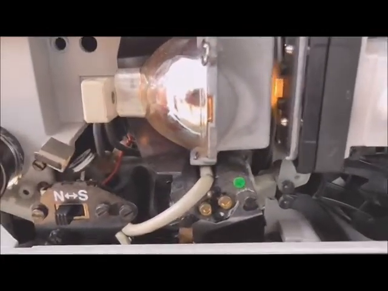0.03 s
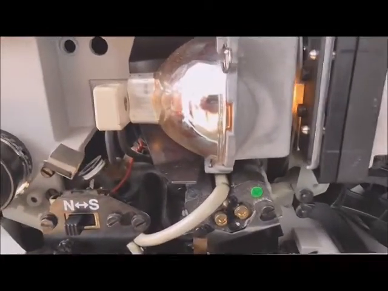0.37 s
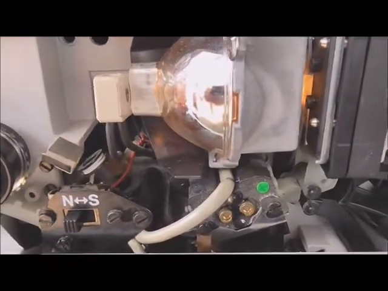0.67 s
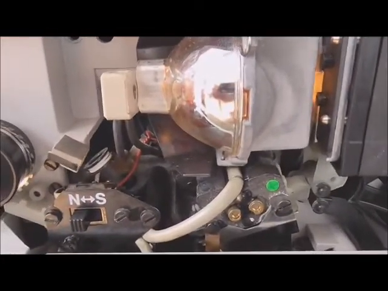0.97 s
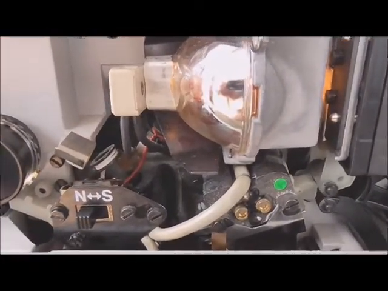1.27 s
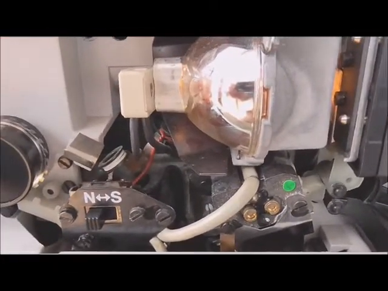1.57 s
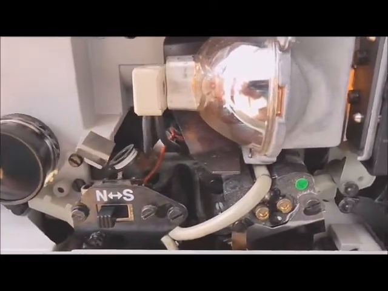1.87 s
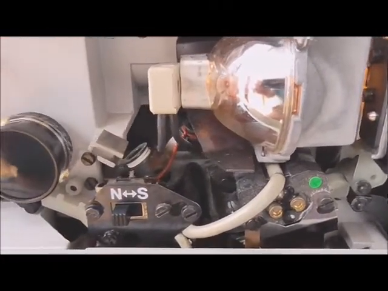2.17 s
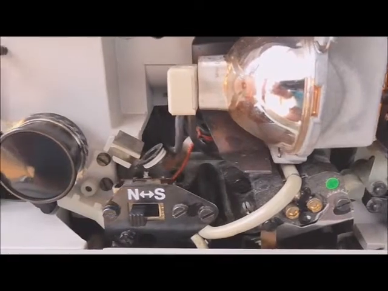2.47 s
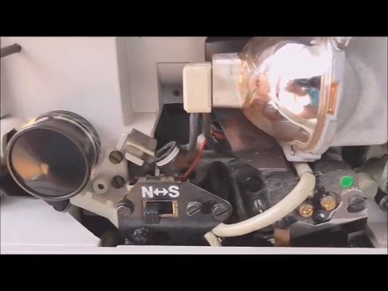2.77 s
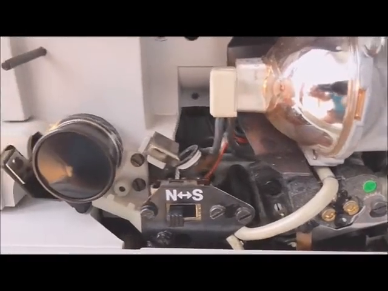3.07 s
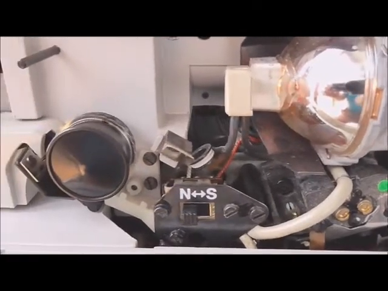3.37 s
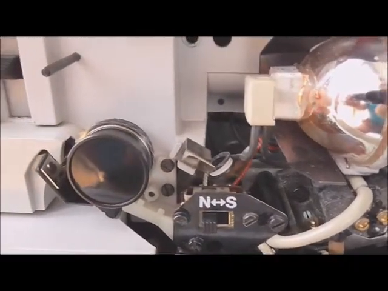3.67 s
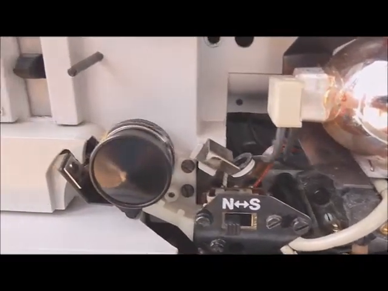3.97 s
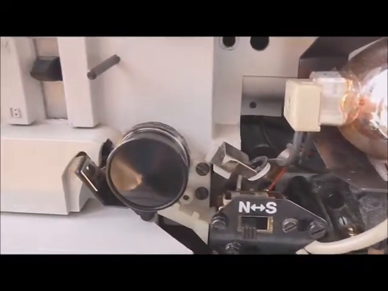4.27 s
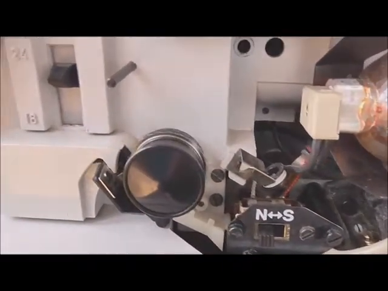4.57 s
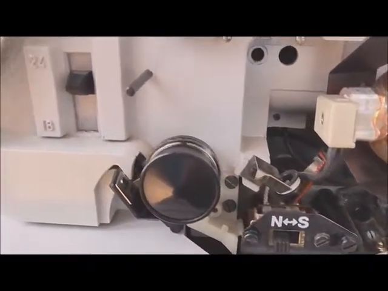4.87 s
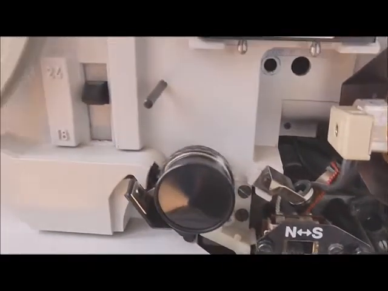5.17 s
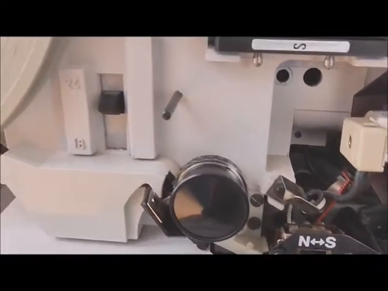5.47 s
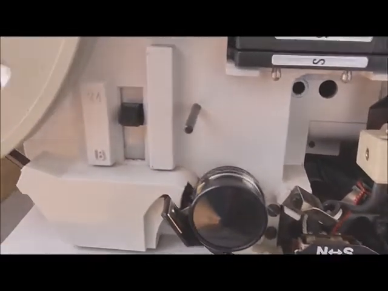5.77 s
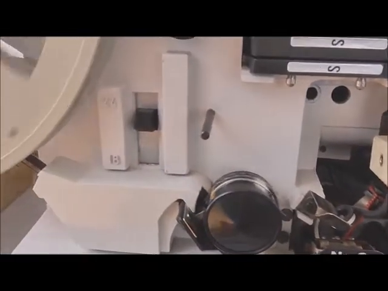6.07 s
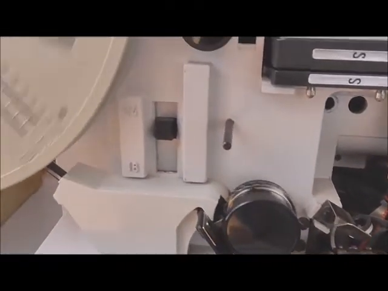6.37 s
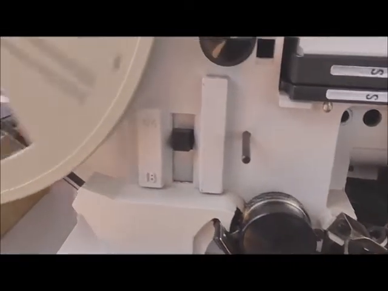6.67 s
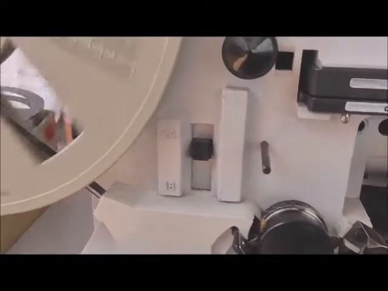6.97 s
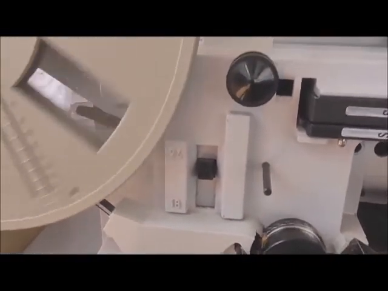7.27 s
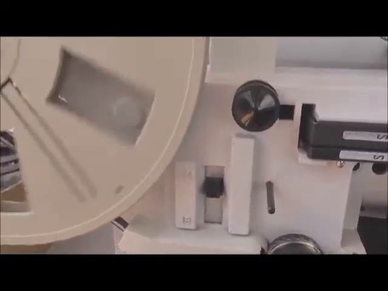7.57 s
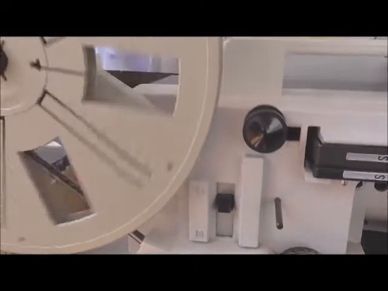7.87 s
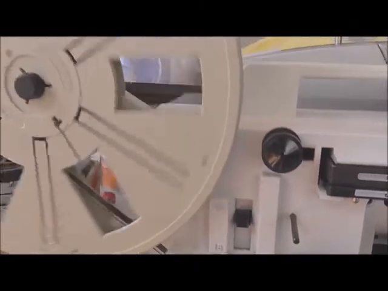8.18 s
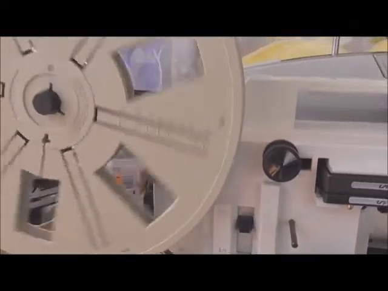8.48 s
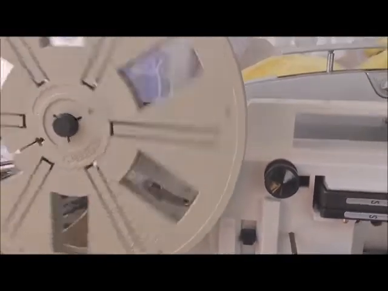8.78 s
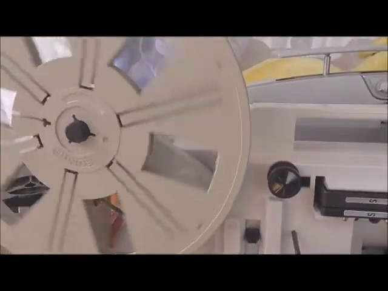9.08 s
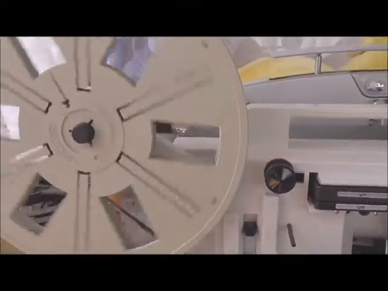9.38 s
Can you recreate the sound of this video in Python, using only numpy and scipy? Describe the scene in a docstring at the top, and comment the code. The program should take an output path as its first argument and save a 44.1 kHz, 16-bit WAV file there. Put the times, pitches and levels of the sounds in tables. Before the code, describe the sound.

Close up, a running film projector clicks rapidly and evenly, with a whine, a whirring fan and faint film hiss.

```python
"""A quick, even clatter with a pulsed whine: a small film projector running with its lamp cover off.
About 23 times a second the claw snaps into the film, the metal gate clicks and the chassis rings.
Under it the cooling fan rushes, the motor hums and the film hisses through its guides with stray ticks.
The balance shifts as the microphone drifts from the lamp, past the lens, to the reel."""
import sys
import numpy as np
from scipy import signal
from scipy.fft import rfft, irfft, next_fast_len
from scipy.io import wavfile
from scipy.ndimage import uniform_filter1d

SR = 44100
rng = np.random.default_rng(int(sys.argv[2]) if len(sys.argv) > 2 else 0)


def wav_out(sig):
    """Save sig, one row per channel (or a flat mono array), as 16-bit PCM at SR to the path in sys.argv[1]."""
    wavfile.write(sys.argv[1], SR, np.round(np.clip(np.atleast_2d(sig).T, -1, 1) * 32767).astype(np.int16))


N = 415863

# the microphone's path: (time [s], spot [0 lamp, 1 lens, 2 reel])
MIC_PATH = [(0, 0), (2.2, 0.15), (3.1, 0.25), (3.7, 0.85), (5.5, 0.96), (7.2, 1.9), (8.2, 1.81),
            (9.43, 1.6)]


def gate_clicks(frames, t, size=1200):
    """The claw rings the gate once a frame; strokes differ a little in force and colour."""
    # the click by band; low ringing builds more slowly:
    # (low [Hz], high [Hz], rise [s], crack [s], tail [s], tail level [dB], left-right likeness [0-1])
    bands = [(1000, 3740, 0.0021, 0.0068, 0.003, -25, 0.66),
             (3490, 8970, 0.00049, 0.0033, 0.0076, -13.5, 0.76),
             (9050, 18000, 0.0002, 0.002, 0.0081, -20.5, 0.11)]
    hz = np.fft.rfftfreq(size, 1 / SR)
    colour = gate_colour(hz, at_times(MIC_PATH, frames)[0])
    spread_db = at_mic((0.1, 0.6, 0.3), frames)
    force = rng.standard_normal(len(frames))
    clicks = 0
    for low_hz, high_hz, *shape in bands:
        share = 1 / (1 + (hz / high_hz) ** 20) - 1 / (1 + (hz / low_hz) ** 20)
        stroke_db = spread_db * (force + rng.standard_normal(len(frames)))
        band = snap(frames, colour * np.sqrt(abs(share)), *shape)
        clicks = clicks + band * from_db(np.interp(t, frames, stroke_db))
    return rms_one(clicks) * pan(-2.4)


def gate_colour(hz, spot):
    """The gate's spectrum from each microphone spot; every resonance is beamed its own way."""
    # claw and gate: (pitch [Hz], width [Hz], level at lamp [dB], at lens [dB], at reel [dB])
    resonances = [(2280, 880, -13.5, -12.5, -12.5), (3018, 70, 0, 1, 0), (3142, 310, -7, -3, -2),
                  (3790, 250, -5.5, -2.5, -1.5), (4396, 192, -1.5, 6, 2), (5086, 120, 9, 7.5, 6),
                  (5550, 1280, -1.5, -3.5, -3.5), (5445, 200, 6, 9, 4.5), (6624, 59, 9, 7, -38),
                  (6746, 135, -15, 6.5, 10), (7680, 1800, -3, -5, -1), (8920, 440, -18, -7, 1),
                  (9950, 1200, -2, -1.5, -6.5), (11490, 520, 7, -5.5, 9), (11730, 350, 6, -1, -22),
                  (12540, 220, 4, 4.5, -4), (14440, 690, -10, -7.5, -8), (14800, 450, -13, -14, -9)]
    centre, width, *level_db = np.transpose(resonances)
    peaks = (1 + (1.29 * (hz - centre[:, None]) / width[:, None]) ** 2) ** -2.0
    nearness = np.maximum(1 - abs(spot[:, None] - np.arange(3)), 0)
    power = from_db(nearness @ np.array(level_db)) ** 2 @ peaks
    low_cut = np.sqrt(1 + (1700 / np.maximum(hz, 1)) ** 8)
    return np.sqrt(power + 1e-6) / low_cut


def snap(frames, colour, rise_s, crack_s, tail_s, tail_db, alike, memory_s=0.013):
    """A sharp stereo crack with a softer tail; the later the ringing, the less it repeats."""
    age = np.arange(2 * (colour.shape[1] - 1)) / SR
    attack = 1 - np.exp(-age / rise_s)
    decay = np.exp(-age / crack_s) + from_db(tail_db) * np.exp(-age / tail_s)
    fresh = 1 - 0.89 * np.exp(-age / memory_s)  # share of the power that is new each stroke
    mid, side = [place(frames, chatter(colour, rms_one(attack * decay), fresh)) for _ in range(2)]
    return stereo(mid, side, alike)


def chatter(colour, fade, fresh, count=9):
    """Bending waves scatter through the gate, much alike from snap to snap; one row a stroke."""
    strokes, size = len(colour), len(fade)
    wanted = colour[np.linspace(0, strokes - 1, count).astype(int)]
    patterns = irfft(rfft(rng.standard_normal((count, size))) * wanted)
    due = uniform_filter1d(wanted ** 2, size=9, axis=1)
    for _ in range(3):  # a sharp snap feeds every resonance its due share
        power = uniform_filter1d(abs(rfft(patterns * fade)) ** 2, size=9, axis=1) / np.sum(fade ** 2)
        gain = np.clip(np.sqrt(abs(due) / (abs(power) + 1e-12)), 1 / 2, 2)
        patterns = irfft(rfft(patterns) * gain)
    along = np.linspace(0, count - 1, strokes)[:, None]
    crossfade = np.cos(np.pi / 2 * np.minimum(abs(along - np.arange(count)), 1))
    repeating = crossfade @ patterns
    loose = irfft(rfft(rng.standard_normal((strokes, size))) * colour)
    return (np.sqrt(1 - fresh) * repeating + np.sqrt(fresh) * loose) * fade


def chassis_whine(frames, t, uneven_db=-0.14, jitter_s=0.00002):
    """Three knocks a frame ring the chassis; the mode near 680 Hz rings on into the next frame and becomes the
    whine."""
    # cam, claw and film stop: (time from the click [s], level [dB])
    knocks = [(-.00124, -2.5), (.0014, 3.5), (.00542, -3)]
    # chassis modes: (pitch [Hz], level [dB], 60 dB decay time [s])
    modes = [(113, -52, 0.05), (243, -43, 0.0081), (327, -48, 0.14), (373, -46, 0.091), (544, -43, 0.1),
             (676.7, -30.5, 0.1), (721.8, -40, 0.1), (810, -23.5, 0.024), (829, -23, 0.017),
             (920, -48.5, 0.15), (1117, -56.5, 0.19), (1348, -37.5, 0.041), (1400, -38.5, 0.11),
             (1480, -60.5, 0.21), (1636, -45.5, 0.074), (2126, -52, 0.069)]
    blows = 0
    for delay, db in knocks:
        late, strength = rng.standard_normal((len(frames), 2)).T
        force = from_db(db + uneven_db * strength)
        blows = blows + place(frames + delay + jitter_s * late, force[:, None])
    upper_gain = from_db(at_mic((-0.2, -0.4, 3), t))  # modes above the whine carry further
    body = 0
    for k, (hz, db, t60) in enumerate(modes):
        mode = (-1) ** k * from_db(db) * ring(blows, hz, t60)
        body = body + mode * (upper_gain if hz > 760 else 1)
    low_cut = signal.butter(1, 156, "high", fs=SR, output="sos")
    left_db = at_mic((0.9, -1.7, -2.5), t)  # slips to the right as the microphone moves
    return signal.sosfilt(low_cut, body) * pan(left_db)


def claw_times(t, first_s=0.0119):
    """The claw strikes once per turn of the shutter shaft."""
    # shutter shaft: (time [s], speed [turns/s])
    shaft_speed = [(0, 22.822), (1.2, 22.829), (2.4, 22.822), (3.6, 22.814), (5.8, 22.806), (8.1, 22.7965),
                   (9.43, 22.803)]
    turns = np.cumsum(at_times(shaft_speed, t)[0]) / SR
    return first_s + np.interp(np.arange(int(turns[-1]) + 1), turns, t)


def fan_rush():
    """Air rushes through the housing, which sings along at two resonances; rms 1."""
    # the air's colour: (frequency [Hz], relative level [dB])
    spectrum = [(30, -23), (70, -14), (150, -9), (230, -5), (330, 5), (440, 5), (590, 0), (850, 2.5),
                (1020, -2), (1300, -5), (1650, -7.5), (2600, -21.5), (6000, -93)]
    air = rush(spectrum)
    return rms_one(air + from_db(-1.5) * resonate(air, 657, 28) + from_db(-5) * resonate(air, 823, 95))


def machine_hum(t):
    """Mains hum beats with the rotor's tone, under the steady whirr of motor, fan and shutter shaft."""
    # rotor and mains: (pitch [Hz], base level [dB])
    hum_tones = [(94.1, -67.5), (99.9, -64)]
    # steady whirr of motor, fan and shutter shaft; 570.5 Hz is an overtone of the frame rate:
    # (pitch [Hz], base level [dB])
    whirr_tones = [(159.7, -70.5), (228.1, -67), (282.3, -77), (300.1, -68.5), (319.3, -71), (329.4, -58.5),
                   (423.6, -68), (570.5, -56.5), (758.7, -57.5), (805.8, -54), (846.9, -49.5), (905.7, -54),
                   (952.8, -63)]
    swell = at_mic((-3.5, 3.5, -1), t)
    hum = wavering_tones(t, hum_tones, swell * 0.83, waver_db=1.0, wander=0.0005)
    whirr = wavering_tones(t, whirr_tones, swell * 0.48, waver_db=2.5, wander=0.00055)
    return hum + whirr


def wavering_tones(t, tones, swell_db, waver_db, wander):
    """Held sines, each wavering a little in level and pitch."""
    chord = 0
    for hz, db in tones:
        level_db = db + swell_db + waver_db * drift(1.4)
        phase = 2 * np.pi * hz * t + wander * hz * drift(0.49)
        chord = chord + from_db(level_db) * np.sqrt(2) * np.sin(phase)
    return chord


def film_hiss(frames, t, slide_db, rub_s=0.026, rub_width_s=0.0024, brush_s=8.84, brush_width_s=0.18):
    """Sliding film hisses unevenly, more as the claw draws back and once as it brushes the reel."""
    # the hiss's colour: (frequency [Hz], relative level [dB])
    spectrum = [(1500, -38), (2600, -9.5), (3300, 1.5), (5300, 3.5), (6200, 0.5), (8200, -0.5),
                (9800, -7.5), (11700, -3), (13500, -11), (16000, -52)]
    since_click = t - frames[np.maximum(np.searchsorted(frames, t) - 1, 0)]
    rub_db = 3 * np.exp(-((since_click - rub_s) / rub_width_s) ** 2)
    brush_db = 4 * np.exp(-((t - brush_s) / brush_width_s) ** 2)
    level_db = at_mic(slide_db, t) + rub_db + brush_db
    return rush(spectrum) * from_db(level_db + 2.16 * drift(48)) * pan(-0.69)


def film_ticks(slide_db, faint_per_s=2.5, decay_s=0.0057, size=800, count=60):
    """The film edge catches in its guides or on the claw: a few hard scratches, faint ones at random."""
    # hard catches: (time [s], level before the band-pass [dB])
    catches = [(3.736, -23), (3.956, -25), (4.307, -26), (4.35, -23), (5.402, -28), (8.836, -24),
               (8.940, -28)]
    faint_s = np.cumsum(rng.exponential(1, count)) / faint_per_s
    faint_db = at_mic(slide_db, faint_s) + 13 + 2 * rng.standard_normal(count)  # riding over the hiss
    times, level_db = np.hstack([np.transpose(catches), [faint_s, faint_db]])
    fade = from_db(level_db)[:, None] * np.exp(-np.arange(size) / SR / decay_s)
    mid, side = [place(times, fade * rng.standard_normal(fade.shape)) for _ in range(2)]
    return resonate(stereo(mid, side, 0.65), hz=6700, width_hz=4500)


def rush(spectrum):
    """Stereo noise of a given colour, wider in the treble; rms 1."""
    # stereo image: (frequency [Hz], left-right likeness [0-1])
    likeness = [(30, .5), (70, 0.77), (150, 0.63), (300, 0.98), (800, 0.91), (1400, 0.82), (3000, 0.41),
                (8000, 0.4), (15000, 0.12)]
    size = next_fast_len(N)
    hz = np.maximum(np.fft.rfftfreq(size, 1 / SR), 1)
    mid, side = rfft(rng.standard_normal((2, size)))
    coloured = stereo(mid, side, at_hz(likeness, hz)) * from_db(at_hz(spectrum, hz))
    return rms_one(irfft(coloured, size)[:, :N])


def drift(rate_hz):
    """A smooth random wobble with a spread of about 1."""
    r = np.exp(-200 * np.pi * rate_hz / SR)  # one step every 100 samples
    slow = signal.lfilter([1], [1, -2 * r, r * r], rng.standard_normal(N // 100 + 2002))[2000:]
    return np.interp(np.arange(N) / 100, np.arange(len(slow)), rms_one(slow))


def ring(clicks, hz, t60):
    """A unit click sets a sine of height 1 ringing."""
    r, w = np.exp(-np.log(1000) / (t60 * SR)), 2 * np.pi * hz / SR
    return signal.lfilter([0, np.sin(w)], [1, -2 * r * np.cos(w), r * r], clicks)


def resonate(x, hz, width_hz):
    """A band-pass resonance with gain 1 at its peak."""
    r, w = np.exp(-np.pi * width_hz / SR), 2 * np.pi * hz / SR
    return signal.lfilter(np.array([1, 0, -1]) * (1 - r * r) / 2, [1, -2 * r * np.cos(w), r * r], x)


def place(times, sounds):
    """Lays one row of sounds at each time."""
    at = np.round(np.asarray(times) * SR).astype(int)[:, None] + np.arange(sounds.shape[1])
    inside = (at >= 0) & (at < N)
    return np.bincount(at[inside], sounds[inside], N) + 1e-18


def stereo(mid, side, alike):
    """Left and right of a given likeness from two unrelated sounds."""
    return np.sqrt((1 + alike) / 2) * mid + np.sqrt((1 - alike) / 2) * side * np.array([[1], [-1]])


def pan(left_db):
    """Channel gains for a left-minus-right level."""
    return from_db(left_db * np.array([[.5], [-.5]]))


def at_mic(by_spot, s):
    """Blends a (lamp, lens, reel) setting along the microphone's path, at the times s."""
    return np.interp(at_times(MIC_PATH, s)[0], np.arange(3), by_spot)


def at_times(rows, s):
    """The columns of a curve table, read at the times s."""
    times, *columns = np.transpose(rows)
    return [np.interp(s, times, c) for c in columns]


def at_hz(rows, hz):
    """A spectrum table, read on a log-frequency axis."""
    frequencies, values = np.transpose(rows)
    return np.interp(np.log(hz), np.log(frequencies), values)


def from_db(db):
    """Decibels to gain."""
    return 10 ** (np.asarray(db) / 20)


def rms_one(x):
    """Scales a sound to rms 1."""
    return x / np.sqrt(np.mean(x ** 2) + 1e-20)


def scene():
    """The machine runs evenly; the microphone's spot (lamp, lens, reel) sets the mix."""
    t = np.arange(N) / SR
    frames = claw_times(t)
    whine = chassis_whine(frames, t) * from_db(at_mic((0.74, 1.67, -4), t))
    clicks = gate_clicks(frames, t) * from_db(at_mic((-37, -37, -37.1), t))
    air = fan_rush() * from_db(at_mic((-42, -37.5, -39.5), t))
    bed = (air + machine_hum(t)) * pan(-0.62)
    slide_db = (-53.5, -49.5, -49)
    return clicks + whine + bed + film_hiss(frames, t, slide_db) + film_ticks(slide_db)


def record(dry, cutoff_hz=16400):
    """A steep low-pass takes off the very top."""
    return signal.sosfilt(signal.ellip(10, .3, 80, cutoff_hz, fs=SR, output="sos"), dry)


dry = scene()
out = record(dry)
wav_out(out)
```